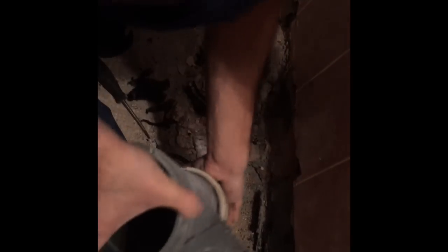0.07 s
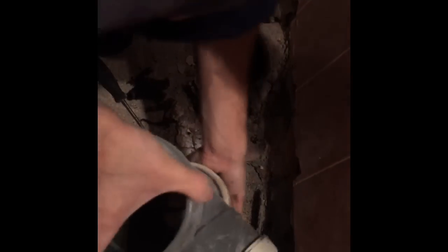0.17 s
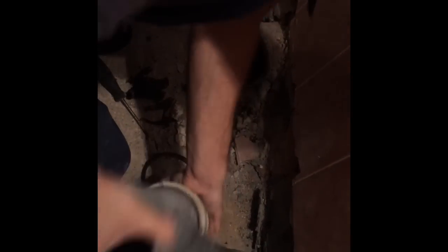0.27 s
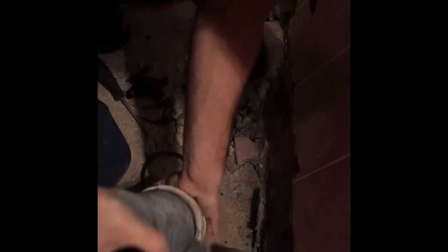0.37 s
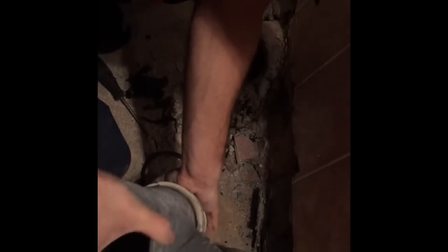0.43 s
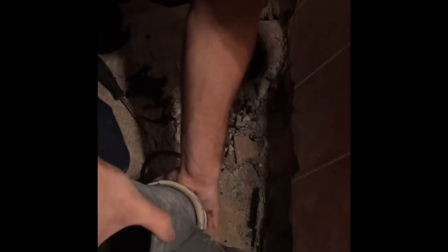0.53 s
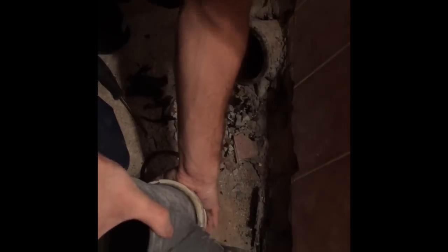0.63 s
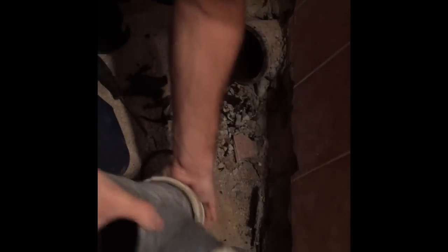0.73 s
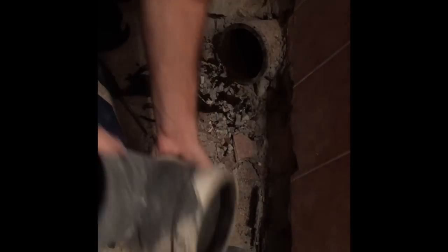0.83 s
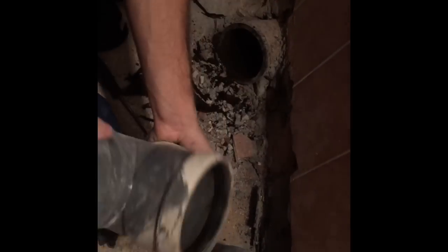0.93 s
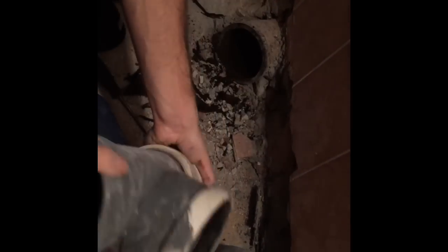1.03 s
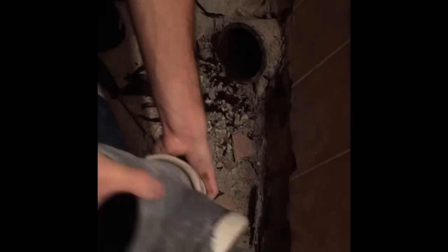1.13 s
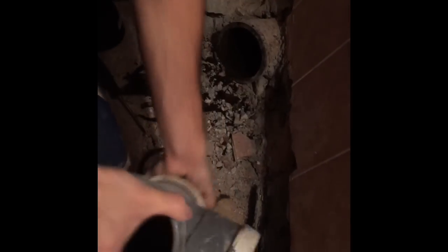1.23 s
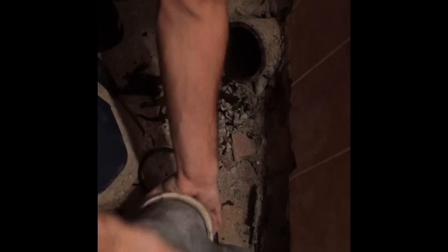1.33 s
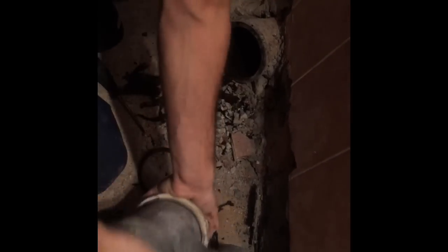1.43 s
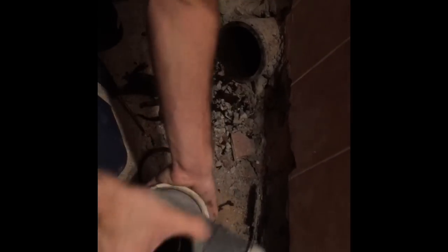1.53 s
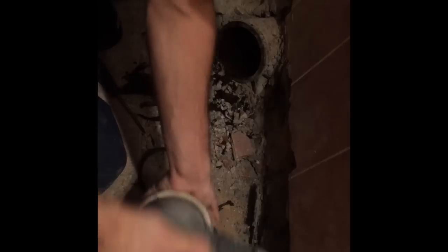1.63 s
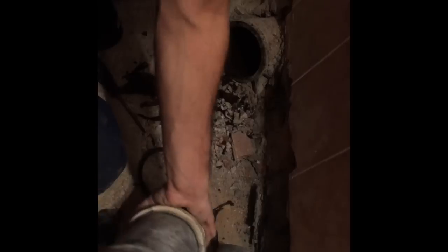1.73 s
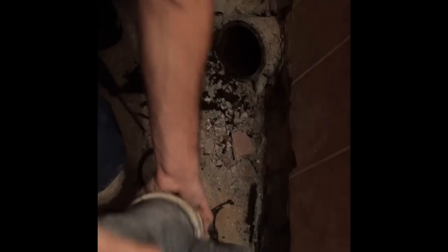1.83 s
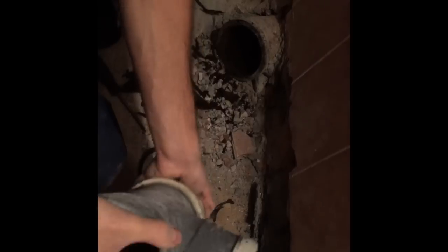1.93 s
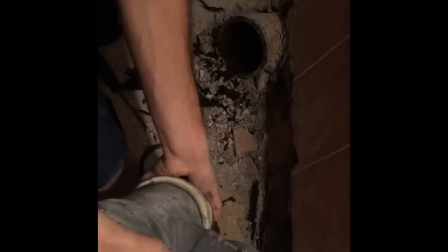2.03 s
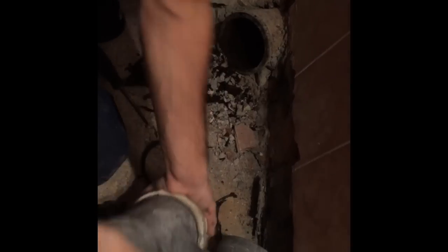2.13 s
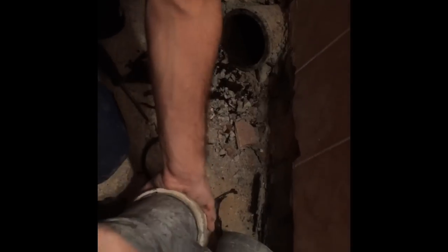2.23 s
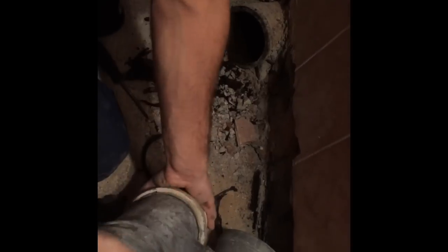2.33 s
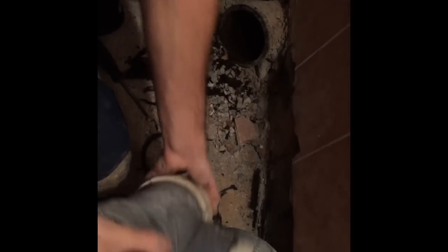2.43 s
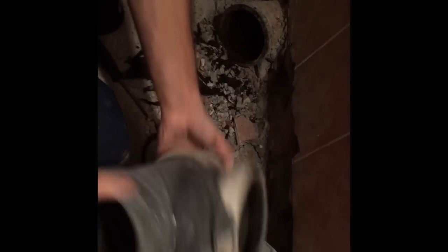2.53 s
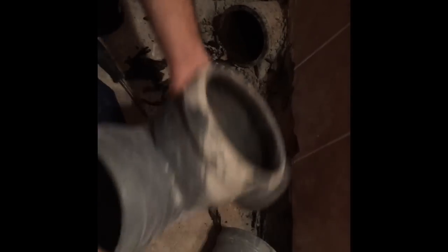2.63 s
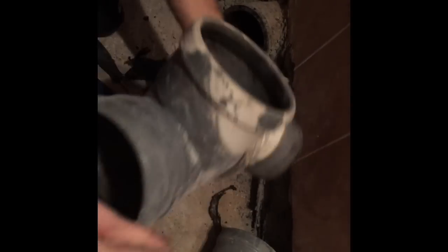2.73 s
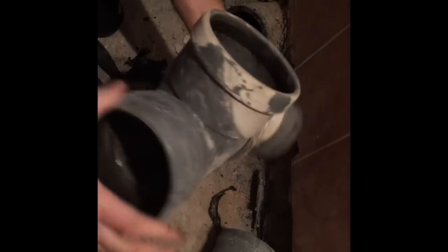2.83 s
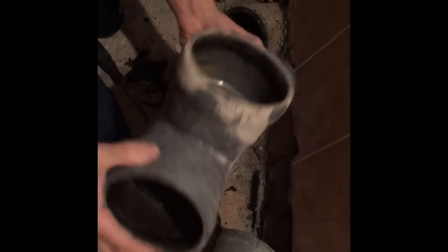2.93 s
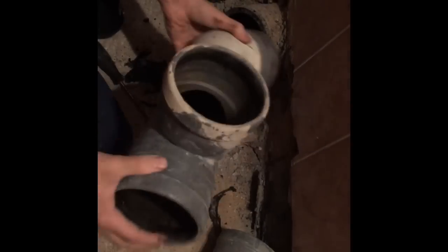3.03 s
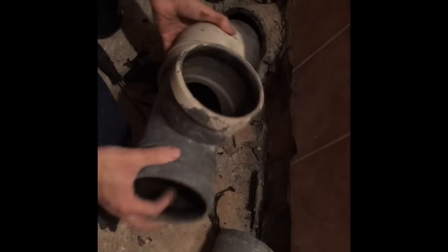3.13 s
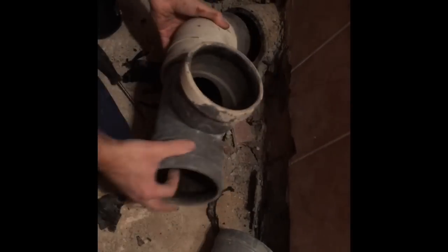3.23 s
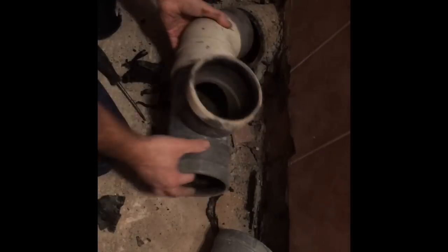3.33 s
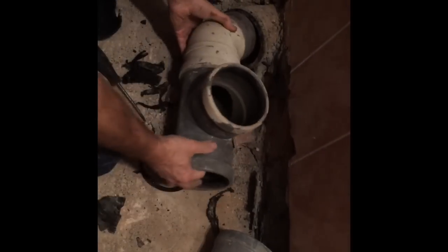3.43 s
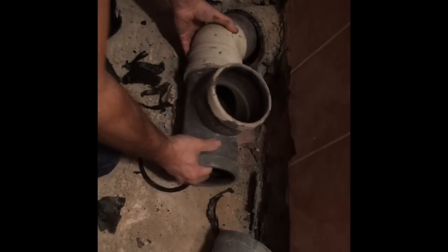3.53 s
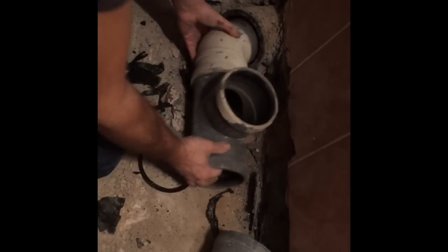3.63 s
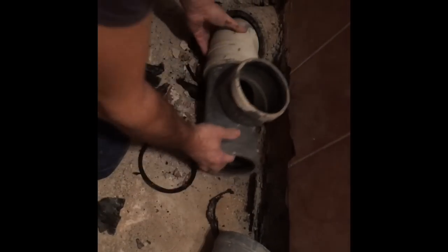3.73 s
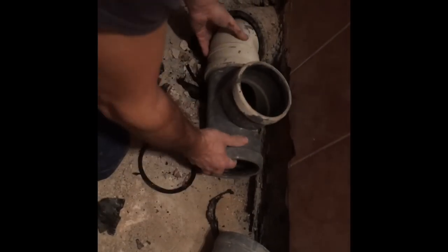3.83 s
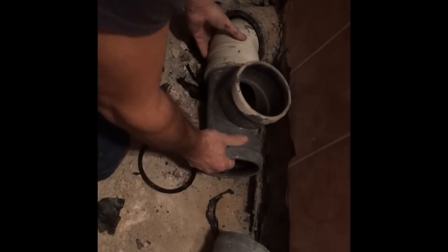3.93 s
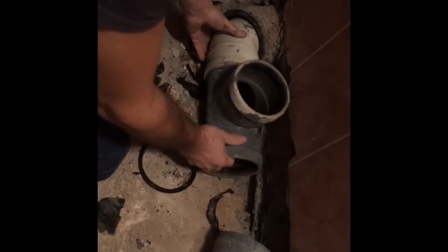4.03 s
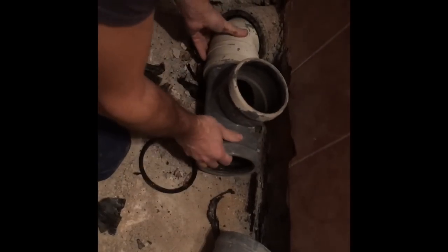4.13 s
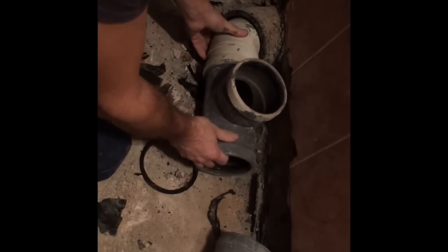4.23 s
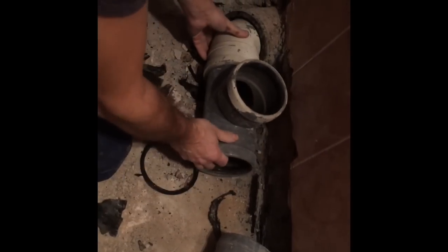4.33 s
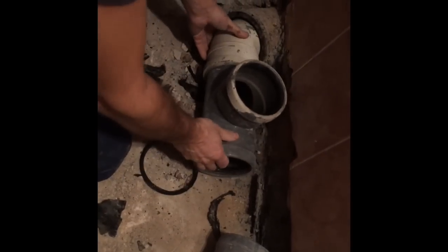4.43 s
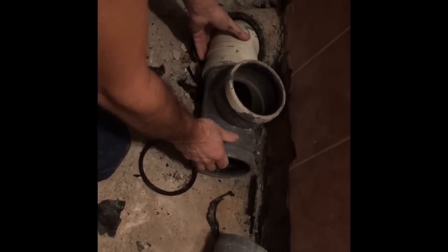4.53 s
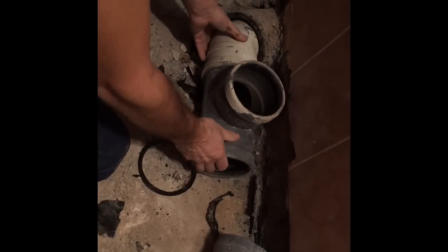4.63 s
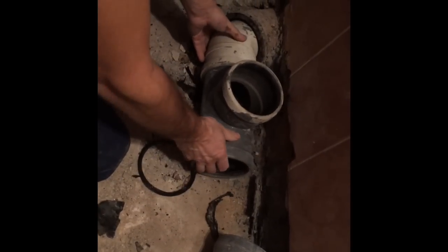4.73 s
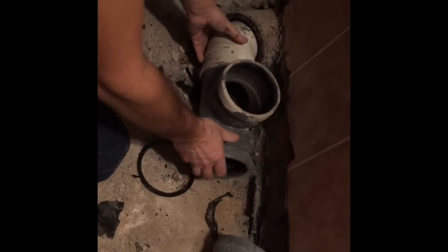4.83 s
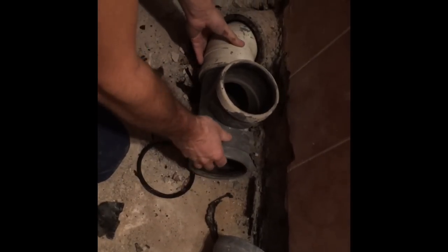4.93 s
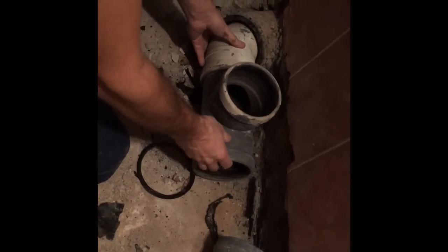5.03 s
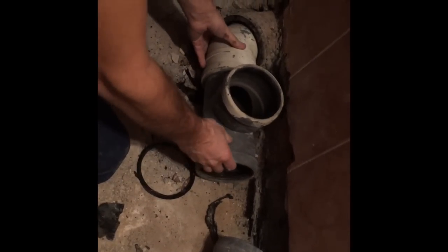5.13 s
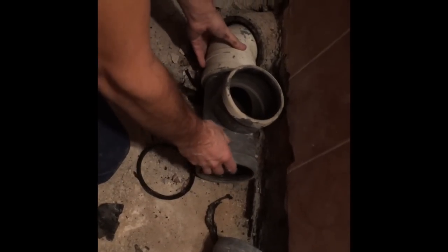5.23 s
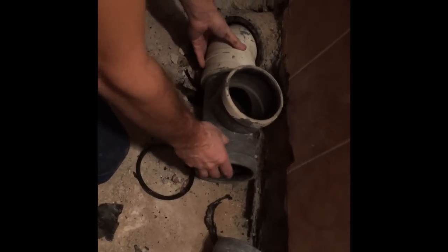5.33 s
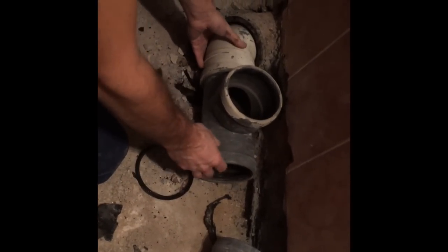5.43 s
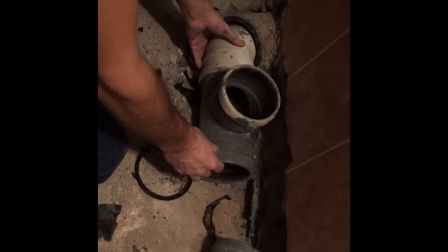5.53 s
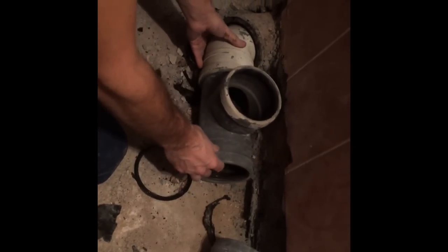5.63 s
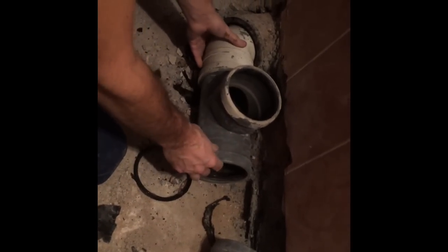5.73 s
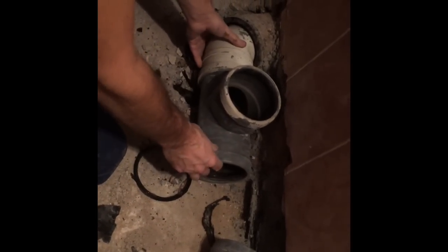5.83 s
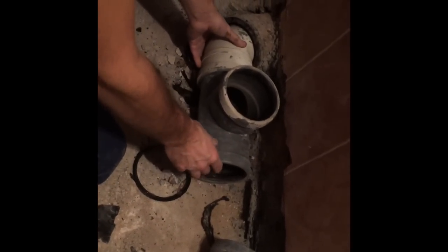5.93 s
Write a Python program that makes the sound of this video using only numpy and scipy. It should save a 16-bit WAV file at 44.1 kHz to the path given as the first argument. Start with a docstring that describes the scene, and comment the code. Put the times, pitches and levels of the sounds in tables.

```python
"""Plastic drain fittings in a bare bathroom

Hands knock the fittings together, then lay them on gritty concrete and push them home. Each knock is a noise crack
that excites damped modes of pipe and room; grit ticks, scuffs and rasps as shaped noise and clumped random slips.
Sparse random taps give the echo, and steady coloured noise with a wavering low hum gives the house."""
import sys
import numpy as np
from scipy import signal
from scipy.fft import rfft, irfft, next_fast_len
from scipy.io import wavfile
from scipy.ndimage import uniform_filter1d

SR = 44100
rng = np.random.default_rng(int(sys.argv[2]) if len(sys.argv) > 2 else 0)


def pcm_store(signal):
    """Save signal as 16-bit PCM."""
    levels = np.round(np.clip(np.atleast_2d(signal), -1, 1) * 32767)
    wavfile.write(sys.argv[1], SR, levels.astype(np.int16).T)


N = 263982
LEAD = SR // 2  # samples of run-up, so that a blow before the start can already be fading


def amp(db):
    """Decibel law: the amplitude gain of a level."""
    return 10 ** (np.asarray(db) / 20)


def evened(x):
    """Normalisation: scales to rms 1."""
    return x / np.sqrt(np.mean(x ** 2) + 1e-20)


def read(points, hz):
    """Interpolation on a log-frequency axis."""
    f, value = np.transpose(points)
    return np.interp(np.log(hz + 1), np.log(f + 1), value)


def add(mix, s, sound):
    """Superposition: mixes a sound in at time s of a mix that starts LEAD samples early."""
    part = mix[LEAD + round(s * SR):][:len(sound)]
    part += sound[:len(part)]


def coloured(x, points):
    """Spectral filtering: shapes x by a table of f/Hz and level/dB, then scales to rms 1."""
    size = next_fast_len(len(x))
    gain = amp(read(points, np.fft.rfftfreq(size, 1 / SR)))
    return evened(irfft(rfft(x, size) * gain, size)[:len(x)])


def ring(modes, t, tune, damping, rise, lift_db):
    """Modal decay: modes swell in and die; each is a close uneven trio of partials, so it beats and wavers."""
    hz, db, t60 = np.transpose(modes)[:, :, None]
    db = db + np.reshape(lift_db, (-1, 1))
    split, phases = rng.random((2, 3, *hz.shape))
    off = 0.051 * (split - .5) * np.reshape([.2, 1, 2], (-1, 1, 1))
    partials = np.sin(2 * np.pi * (hz * tune * (1 + off) * t + phases))
    trio = (partials * np.reshape([1, .7, .6], (-1, 1, 1))).sum(0)
    decay = amp(db - 60 * damping * t / t60)
    return (decay * trio * (1 - np.exp(-t / rise))).sum(0)


# blows of one fitting on the other or on the concrete, the first already fading; levels are relative:
# (t/s, clatter lift/dB, crack/dB, echo/dB, treble setting/dB, pipe air/dB, pipe wall/dB, deep boom/dB,
# upper boom/dB, pipe tuning factor, rumble left in the pipe/dB, shudder left in the floor/dB, fall of both/(dB/s))
KNOCKS = [(-0.2, -3, -15, -19, 6, -8, -4, -38, -38, 0.94, -10, -10.5, 80),
          (0.339, 7, 3, -12, -5, -20.5, -1, -16, -30, 0.96, -21, -23.5, 50.5),
          (1.357, 0, 4, -17, 1, -18.5, -18, -20.5, -13, 0.92, -21, -25.5, 31),
          (1.9075, -6, -22, -45, -23, -36, -32.5, -46, -42.5, 1.03, -45, -50, 84),
          (2.1971, -1, 4.9, -14, -5.5, -12, -2, -31, -19.5, 1.05, -19, -24.5, 50),
          (2.2343, 4, 3.5, -21, -9.5, -20, -11, -11, -18.5, 1.16, -48, -49, 55),
          (2.628, 12, -38, -42, -29, -54, -24, -30.5, -64, 0.85, -62, -59, 57),
          (3.6441, -3, -21, -59, -28, -23.5, -23.5, -35, -34.5, 0.85, -29.5, -41, 59),
          (3.7457, -14, -16.5, -57, -11, -39, -26.5, -40, -26.5, 1.23, -54, -37, 63),
          (3.851, -8, -17, -36, -19.5, -23, -19.5, -23, -20, 0.91, -28, -25.5, 89),
          (3.91, 5, -15, -44.5, -5, -51, -51, -36, -30, 0.65, -38, -50, 62),
          (4.0141, 2, -57, -61, -23, -57, -40.5, -34, -25.5, 0.86, -48, -32.5, 80),
          (4.3144, 14, -19, -53.5, -5.5, -47.5, -27, -64.5, -51, 0.83, -44, -65, 150),
          (5.5991, 6, -58, -65, 8, -47, -53, -46, -69, 0.84, -52, -61, 82),
          (5.7313, 2, -54, -58, 6, -60, -35.5, -29.5, -60, 0.95, -57, -42.5, 80),
          (5.7599, 5, -40, -62.5, 4, -49.5, -34.5, -46, -41, 0.8, -45, -43.5, 127)]
# spectrum of the crack before each blow's tilt: (f/Hz, relative level/dB)
CRACK = [(71, -26.5), (120, -16.5), (173, -6.5), (272, -15.5), (393, 8.5), (569, -11), (930, -12),
         (1490, -19.5), (2530, -15), (3170, -20), (12800, -34), (14700, -33.5), (16000, -63.5)]
# modes of the pipe, air below 520 Hz and wall above, before tuning and damping: (f/Hz, level/dB, t60/s)
PIPE = [(276, -13.5, 0.66), (339.8, -3, 0.5), (360.5, 1.5, 0.61), (387, 3.5, 0.45), (402, -11, 0.11),
        (477.8, -2.5, 0.37), (610, -1.5, 0.1), (616.7, -25, 0.23), (675, -5, 0.11), (687, -7.5, 0.12),
        (778, -25, 0.26), (895, -8, .1), (990, -4, 0.056), (1164.5, -13, 0.15)]
# modes of the room, before damping: (f/Hz, level/dB, t60/s)
BOOM = [(56.5, -13.5, 0.64), (93.9, -3.5, 1.23), (113.6, 0.5, 0.66), (135, -0.5, 0.37), (165.7, -5, 0.79),
        (190.2, -4, 0.84), (226.1, -10, 0.57), (247.3, -15.5, 0.68)]
CRACK_RISE_S, CRACK_S, RUMBLE_RISE_S = 0.0012, 0.0019, 0.011  # exponential time constants
PIPE_DAMPING, BOOM_DAMPING = 3.32, 2.1  # factors that divide t60
CLATTER_HZ, CLATTER_OCTAVES = 1700, .45  # the band that some blows favour and others miss


def crack_colour(treble_db, clatter_db):
    """Contact spectrum: tilts the crack about 2500 Hz and lifts or cuts its clatter band."""
    tilted = [(hz, db + 0.2 * (treble_db + 15) * np.log2(hz / 2500)) for hz, db in CRACK]
    return [(hz, db + clatter_db * np.exp(-(np.log2(hz / CLATTER_HZ) / CLATTER_OCTAVES) ** 2))
            for hz, db in tilted]


def knocks():
    """Impact excitation: a brief crack sets pipe and room modes ringing; returns near sound and sound sent to walls."""
    near, sent = np.zeros(N + LEAD), np.zeros(N + LEAD)
    t = np.arange(SR * 3 // 4) / SR
    air = np.array([hz < 520 for hz, db, t60 in PIPE])
    deep = np.array([hz < 104 for hz, db, t60 in BOOM])
    pipe_rise = np.where(air, .016, .004)[:, None]  # s
    fade = signal.windows.tukey(2 * len(t), .3)[len(t):]
    crack_t = t[:2048]
    burst = np.exp(-crack_t / CRACK_S) * (1 - np.exp(-crack_t / CRACK_RISE_S))
    for (s, clatter_db, crack_db, echo_db, treble_db, air_db, wall_db, deep_db, upper_db,
         tune, rumble_db, shudder_db, fall) in KNOCKS:
        colour = crack_colour(treble_db, clatter_db)
        # a brief contact sheds little bass
        thin = [(hz, db + 5.6 * min(np.log2(hz / 900), 0)) for hz, db in colour]
        pipe = fade * ring(PIPE, t, tune, PIPE_DAMPING, pipe_rise, np.where(air, air_db, wall_db))
        boom = fade * ring(BOOM, t, 1, BOOM_DAMPING, 0.024, np.where(deep, deep_db, upper_db))
        rumble, shudder = shaken(slipping(len(t)), tune)
        after_envelope = fade * (1 - np.exp(-t / RUMBLE_RISE_S)) * amp(-fall * t)
        after = after_envelope * (amp(rumble_db) * rumble + amp(shudder_db) * shudder)
        add(near, s, amp(crack_db) * burst * coloured(rng.standard_normal(2048), thin))
        add(near, s, pipe + boom + after)
        add(sent, s, amp(-3.0) * pipe)
        # the walls hear the blow as one clean, duller click
        duller = [(hz, db - 2.95 * max(np.log2(hz / 3000), 0)) for hz, db in colour]
        click = coloured(signal.unit_impulse(2048, 1024), duller)
        add(sent, s - len(click) / 2 / SR, amp(echo_db) * click)
    return near, sent


def slipping(size):
    """Stick-slip friction: dense uneven slips of grit, in clumps."""
    slips = amp(1.5 * rng.exponential(1, size)) * rng.standard_normal(size) * (rng.random(size) < .3)
    clumps_db = evened(uniform_filter1d(rng.standard_normal(size), 150))
    return slips * amp(clumps_db)


def shaken(slips, tune):
    """Forced resonance: slips shake the pipe air and the floor into rumble and shudder, each rms 1."""
    t = np.arange(SR // 4) / SR
    return [evened(signal.oaconvolve(slips, ring(modes, t, factor, 5.9, 0.0064, 0))[:len(slips)])
            for modes, factor in ((PIPE[:6], tune), (BOOM, 1))]


# rubbing, one table a stretch: (t/s, rasp level/dB, dull rasp level/dB)
RUBS = [
    [(0.0, -47, -37), (0.088, -61, -46.5), (0.12, -60, -49), (0.188, -66, -52), (0.236, -58, -65),
     (0.246, -68, -56.5), (0.288, -63, -57.5), (0.31, -47, -51)],
    [(0.45, -41.5, -27.5), (0.742, -57.5, -42), (0.752, -54, -39), (0.768, -55, -40), (0.84, -61, -52),
     (0.864, -39, -42), (0.876, -59, -51), (0.95, -64, -55)],
    [(0.95, -54, -60), (1.016, -56, -56.5), (1.038, -40.5, -39), (1.06, -26, -45), (1.07, -40, -39.5),
     (1.104, -50, -49), (1.268, -59.5, -62), (1.335, -43.5, -48)],
    [(1.42, -54, -25), (1.562, -51, -51), (1.582, -36, -37.5), (1.768, -55.5, -47.5), (1.78, -36, -48),
     (1.828, -49, -42), (1.878, -62, -51), (1.9, -39, -45)],
    [(3.55, -59, -68), (3.658, -42.5, -49), (3.678, -45.5, -57), (3.842, -46, -46), (3.854, -30.5, -25),
     (3.9, -62, -40.5), (3.908, -37.5, -31.5), (4.0, -76, -62)],
    [(4.0, -58, -57), (4.098, -63.5, -61), (4.164, -56.5, -50), (4.286, -70, -79), (4.3, -47, -45),
     (4.318, -34.5, -37), (4.338, -60, -48), (4.4, -72, -61)],
    [(4.4, -60, -56), (4.592, -68, -64), (4.62, -78, -70), (4.834, -81, -71), (4.96, -54, -63),
     (4.966, -56, -52), (5.012, -69.5, -74), (5.03, -67, -72)],
    [(5.03, -66, -70), (5.092, -51, -49.5), (5.11, -61, -62), (5.154, -57, -55.5), (5.324, -65.5, -61),
     (5.352, -78.5, -67), (5.49, -75, -70.5), (5.5, -82.5, -61)],
    [(5.5, -79, -55), (5.518, -70, -79.5), (5.63, -52, -50.5), (5.638, -75, -65), (5.682, -69, -77),
     (5.76, -49.5, -51.5), (5.916, -83.5, -80.5), (5.986, -66, -74)],
]
# smooth swishes of hands on the pipe as it is lifted and carried, one table a stretch:
# (t/s, rasp level/dB, dull rasp level/dB)
SWISHES = [
    [(1.92, -59, -55), (1.958, -57.5, -57.5), (2.102, -67, -60.5), (2.15, -48, -59), (2.18, -50.5, -55)],
    [(2.4, -72, -41.5), (2.444, -53, -46.5), (2.454, -61, -43.5), (2.506, -53, -44), (2.572, -69, -47),
     (2.632, -50, -48.5), (2.78, -51, -55.5), (2.87, -67, -60)],
    [(2.87, -67, -58), (2.896, -59.5, -56.5), (3.054, -47, -60), (3.118, -60, -57.5), (3.128, -52, -61),
     (3.138, -56, -60), (3.226, -66, -65), (3.25, -66, -61)],
    [(3.25, -63, -68), (3.306, -64, -68), (3.372, -51.5, -58.5), (3.432, -51, -57), (3.452, -47.5, -53),
     (3.528, -49.5, -53.5), (3.55, -54, -54)],
]
# spectrum of the rasp before the rim's lift: (f/Hz, relative level/dB)
RASP = [(410, 5.5), (700, 6), (1060, 1), (1180, 1), (1420, 1), (1710, -2), (2020, -1.5), (3240, -11.5),
        (5540, -15), (6740, -15), (14000, -22), (15400, -14), (16000, -44.5)]
# bands that the rubbed rim favours: (f/Hz, width/Hz, lift/dB)
RIM = [(2450, 110, 5.5), (4600, 3000, 4), (6530, 580, -1.5)]
CRUMBS_PER_S, CRUMB_DB, CRUMB_S = 60, -2.5, .003  # larger grains that crack under a rub; decay time constant
SMOOTH_DB = -60  # crumbs all but vanish under a swish
RUB_TUNING_FACTOR, RUB_RUMBLE_DB, RUB_SHUDDER_DB = 1, -7, -0.5  # pipe and floor follow the dull rasp
HOLD_S = .02  # a rub goes on past its last row


def rubbing():
    """Friction noise: slips of grit rasp, and shake the air in the pipe and the floor."""
    out = np.zeros(N + LEAD)
    grid = np.geomspace(300, 16000, 120)
    lift_db = sum(db / (1 + (2 * (grid - hz) / width) ** 2) for hz, width, db in RIM)
    colour = np.transpose([grid, read(RASP, grid) + lift_db])
    lowpass = signal.butter(2, 3000, fs=SR, output="sos")
    for rows, crumb_db in [(r, CRUMB_DB) for r in RUBS] + [(r, SMOOTH_DB) for r in SWISHES]:
        s, *columns = np.transpose(rows)
        t = np.arange(s[0], s[-1] + HOLD_S, 1 / SR)
        rasp_db, dull_db = (np.interp(t, s, c) for c in columns)
        slips = slipping(len(t))
        crumbs = (rng.random(len(t)) < CRUMBS_PER_S / SR) * rng.exponential(1, len(t))
        crumbling = signal.lfilter([1], [1, -np.exp(-1 / CRUMB_S / SR)], crumbs)
        slips = slips * (1 + amp(crumb_db) * crumbling)
        rasp = coloured(slips, colour)
        dull = signal.sosfiltfilt(lowpass, rasp)
        rumble, shudder = shaken(slips, RUB_TUNING_FACTOR)
        body = evened(dull) + amp(RUB_RUMBLE_DB) * rumble + amp(RUB_SHUDDER_DB) * shudder
        sound = amp(rasp_db) * evened(rasp - dull) + amp(dull_db) * body
        add(out, s[0], sound * signal.windows.tukey(len(t), 200 / len(t)))
    return out


# the louder ticks of grit and rims: (t/s, level/dB, centre f/Hz, low part/dB, high part/dB)
TICKS = [(0.1226, -45, 10700, -24, 0), (0.4944, -26.5, 3600, 21, -32), (0.5863, -34.5, 3630, -4, -12),
         (0.65, -42, 4530, 1, -1), (0.7507, -37.5, 5270, -16, 2), (0.814, -46, 3610, 1, 3),
         (0.9055, -44, 3569, -17, -10), (0.981, -48, 5470, -15, 0), (1.1644, -42, 4620, 6, -14),
         (1.3064, -38, 5420, -9, -1), (1.5144, -39, 4300, -12, -33), (1.5677, -30.5, 5600, -16, -6),
         (1.607, -28, 4300, 11, -18), (1.6196, -20.5, 5655, -9, -19), (1.7003, -35.5, 6094, -16, -2),
         (1.7345, -33, 4900, 4, -7), (1.7844, -24, 5260, -23, -5), (1.8035, -39, 6100, -23, -10),
         (1.8176, -23, 7127, -1, -9), (1.9074, -20.5, 3940, -16, -23), (2.3835, -40, 3550, -5, -3),
         (2.433, -42, 5330, -2, -5), (3.047, -41.5, 5170, 5, 4), (3.1282, -40, 4200, -2, -16),
         (3.5674, -33.5, 4540, -2, -7), (3.6056, -30, 11000, 2, -4), (3.6327, -26, 4600, 1, -6),
         (3.774, -32.5, 5400, -19, -12), (3.7876, -32, 3630, 8, -5), (3.874, -44, 4770, 2, -14),
         (3.922, -28, 3700, 3, -33), (4.3024, -31.5, 4660, 2, -36), (5.147, -46.5, 4510, -5, -32),
         (5.577, -50.5, 4730, -12, -22.5), (5.7322, -40.5, 3900, -2, -35)]
# short scuffs as a rim slips, with a slow start: (t/s, level/dB, centre f/Hz, low part/dB, high part/dB)
SCUFFS = [(0.3164, -31.5, 4000, 10, -5), (0.859, -33.5, 4520, 13, -11), (1.035, -34, 4090, 14, -23),
          (1.054, -26, 5050, 9.5, -41), (1.3755, -14.5, 5600, 3, -9), (1.4, -23, 3930, -11, -9),
          (1.5813, -25, 5100, -6, -25), (1.7776, -32, 5270, -8, -12), (1.8949, -41, 4060, -38, 2),
          (3.6565, -35, 5470, 4, -11), (3.8056, -31, 3670, 6, -19), (3.8441, -29, 5140, -5, -17.5),
          (4.1514, -50.5, 3900, 3, -34.5), (4.9651, -53.5, 4710, -4, -12),
          (5.085, -49.5, 4390, -12.5, -26.5), (5.6226, -45, 4340, 0, -15.5),
          (5.7864, -48.5, 3940, -25, -16.5)]
TICK_RISE_S, TICK_FALL_S, SCUFF_RISE_S, SCUFF_FALL_S = 0.00082, 0.0067, 0.0075, 0.0082


def ticks(rows, rise, fall):
    """Transient noise: short gritty bursts with a broad spectral peak at each centre."""
    out, t = np.zeros(N + LEAD), np.arange(3072) / SR
    envelope = np.where(t < rise, (t / rise) ** 2, np.exp((rise - t) / fall))
    for s, db, hz, low_db, high_db in rows:
        shape = [(500, low_db - 29.0), (1200, low_db - 3.5), (2500, low_db + 1), (3200, low_db / 2 - 7.5),
                 (hz / 1.9, -4), (hz, 0), (hz * 3.3, -6), (13000, high_db)]
        # the level jumps every 32 samples: gritty, not smooth
        grit_db = 2.46 * rng.exponential(1, len(t) // 32).repeat(32)
        grains = rng.standard_normal(len(t)) * amp(grit_db)
        burst = envelope * coloured(grains, sorted(shape))
        burst_gain = amp(db) * np.linalg.norm(envelope) / np.linalg.norm(burst)
        add(out, s - rise / 2, burst * burst_gain)
    return out


# reverberation time of the room: (f/Hz, t60/s)
ROOM = [(60, 0.8), (160, 0.41), (420, 0.52), (1100, 0.63), (2910, 0.45), (6000, 0.36), (10000, 0.21),
        (15000, 0.32)]
ROOM_RISE_S = 0.0083  # the echo builds up


def bathroom(x):
    """Reverberation: sparse taps of random sign, each band dying at its own speed; three tails take turns."""
    out, turn = np.zeros(len(x)), np.arange(len(x)) / SR * np.pi / 1.236
    for k in range(3):
        taps, at = np.zeros(SR), np.arange(120, SR - 20, 20)
        taps[at + rng.integers(0, 20, len(at))] = rng.choice([-1., 1.], len(at))
        hz, t, z = signal.stft(taps, SR, nperseg=512)
        decay = amp(-60 * t / read(ROOM, hz)[:, None])
        tail = signal.istft(z * decay, SR, nperseg=512)[1]
        tail = tail * (1 - np.exp(-np.arange(len(tail)) / SR / ROOM_RISE_S))
        share = np.sqrt(2 / 3) * np.cos(turn + k * np.pi / 3)  # the squared shares sum to 1
        out += signal.oaconvolve(x * share, tail / np.linalg.norm(tail))[:len(x)]
    return out


# spectrum of the steady house noise: (f/Hz, relative level/dB)
HUSH = [(12, -74.5), (20, -40), (39, -20), (63, 2), (134, -23.5), (187, -7.5), (216, -12.5), (301, -23),
        (542, -25.5), (802, -25.5), (1220, -33.5), (13500, -51), (16000, -67.5)]
HUSH_DB = -51.5
# bands of the hum: (f/Hz, width/Hz, relative level/dB)
HUM = [(58.4, 31, -2), (109, 35, -2), (189.7, 89, -21)]
# the hum swells and sinks: (t/s, level/dB)
HUM_LEVEL = [(0.0, -42), (0.18, -52), (0.35, -52.5), (0.53, -52.5), (0.92, -45), (1.35, -47), (1.6, -58.5),
             (2.03, -48), (2.25, -44.5), (2.38, -40.5), (3.02, -46.5), (3.65, -51), (3.93, -47), (4.3, -48),
             (4.97, -52), (5.99, -47)]


def hush():
    """Stationary and narrow-band noise: the steady house noise, and a hum that wavers as its bands are narrow."""
    hz = np.fft.rfftfreq(N, 1 / SR)
    hum = np.zeros(N)
    for centre, width, db in HUM:
        resonance = 1 / (1 + (2 * (hz - centre) / width) ** 2)
        hum += amp(db) * evened(irfft(rfft(rng.standard_normal(N)) * resonance, N))
    hum_db = np.interp(np.arange(N) / SR, *np.transpose(HUM_LEVEL))
    return amp(HUSH_DB) * coloured(rng.standard_normal(N), HUSH) + hum * amp(hum_db)


def scene():
    """Superposition of near sounds, their echo and the hush."""
    near, sent = knocks()
    grit = ticks(TICKS, TICK_RISE_S, TICK_FALL_S) + ticks(SCUFFS, SCUFF_RISE_S, SCUFF_FALL_S) + rubbing()
    echo = bathroom(sent + amp(-12.5) * grit)
    return ((near + grit + echo)[LEAD:] + hush())[None]


# response of the microphone: (f/Hz, gain/dB)
MICROPHONE = [(12, -13.5), (30, -5), (200, -2.46), (12000, -1.3), (14500, -9.5), (15500, -16.5),
              (16000, -26.5)]
EDGE_HZ = 16300  # band limit


def record(dry):
    """Transduction and compression: microphone response, gentle limiter, soft ceiling, then the band limit."""
    dry = irfft(rfft(dry) * amp(read(MICROPHONE, np.fft.rfftfreq(N, 1 / SR))), N)
    power_db = 10 * np.log10(abs(uniform_filter1d(dry[0] ** 2, 200, origin=99)) + 1e-12)
    fall = np.arange(N) * 60. / SR  # the held level falls no faster than 60 dB a second
    held_db = np.maximum.accumulate(power_db + fall) - fall
    over_db = np.maximum(held_db + 15.0, 0)  # excess above -15 dB
    limited = dry / amp(0.085 * uniform_filter1d(over_db, 60))
    rounded = np.tanh(limited / 1.031) * 1.144
    lowpass = signal.firwin(511, EDGE_HZ, window=("kaiser", 9), fs=SR)
    return signal.oaconvolve(rounded, lowpass[None], "same")


dry = scene()
out = record(dry)
pcm_store(out)
```